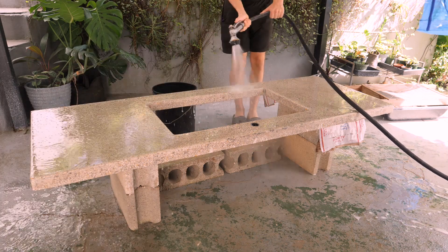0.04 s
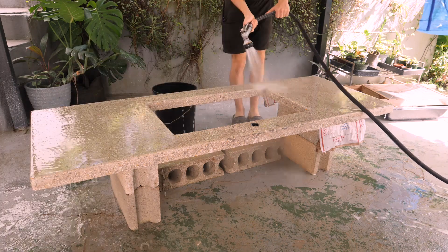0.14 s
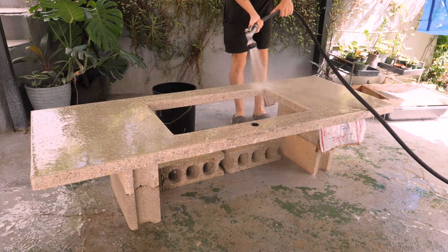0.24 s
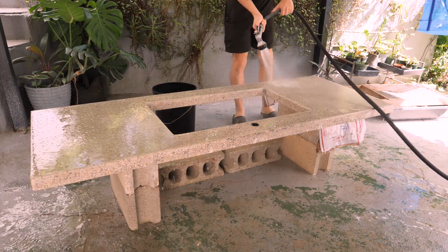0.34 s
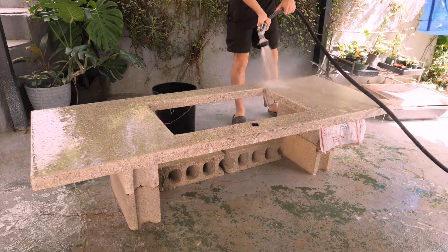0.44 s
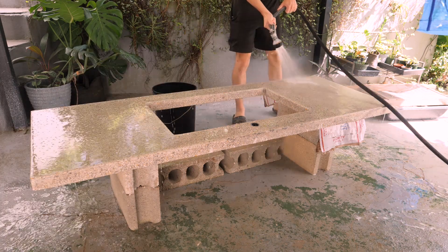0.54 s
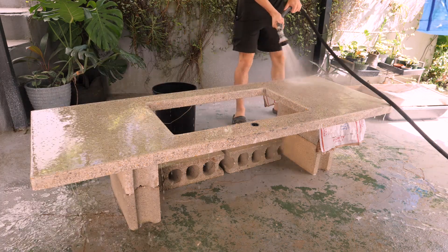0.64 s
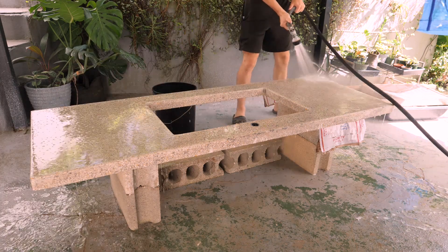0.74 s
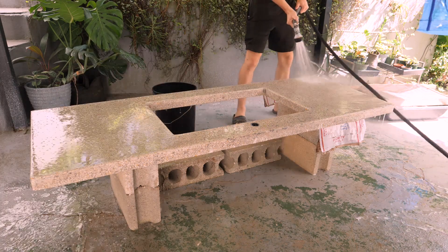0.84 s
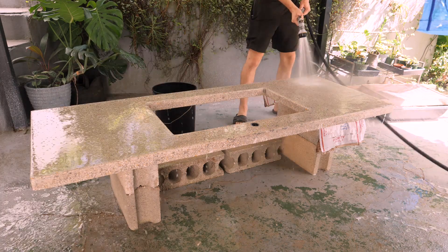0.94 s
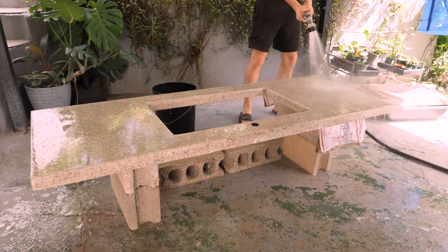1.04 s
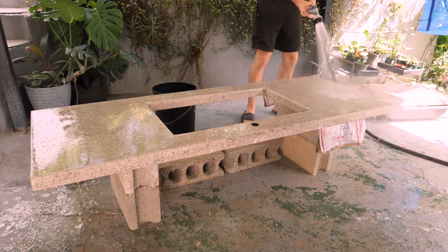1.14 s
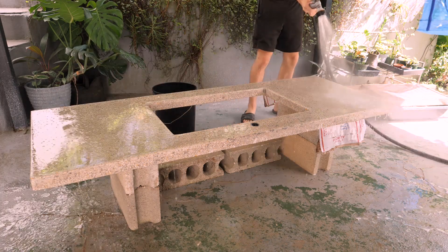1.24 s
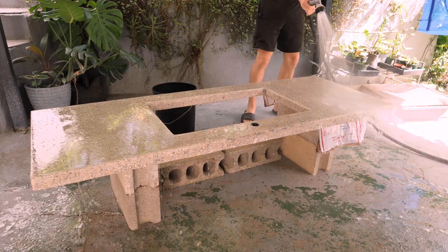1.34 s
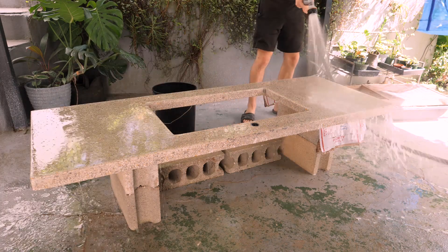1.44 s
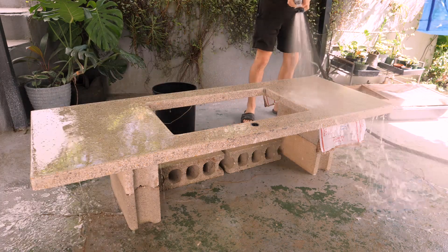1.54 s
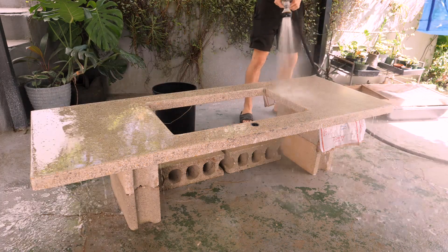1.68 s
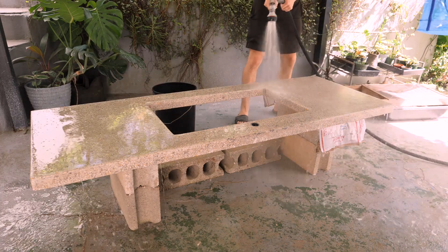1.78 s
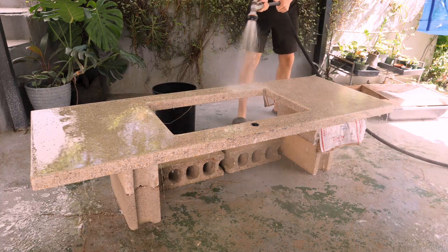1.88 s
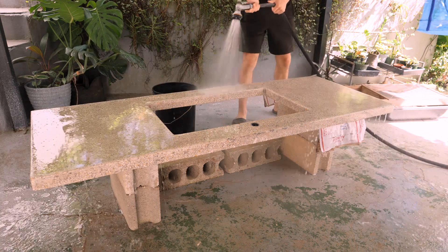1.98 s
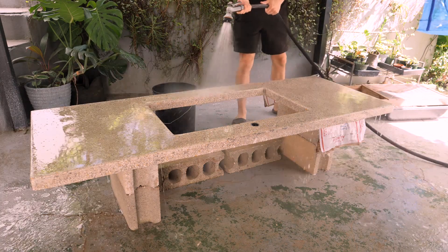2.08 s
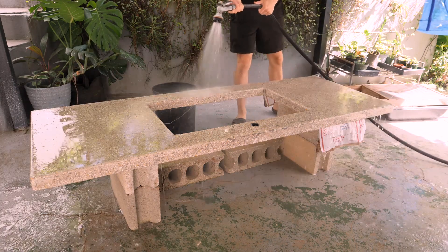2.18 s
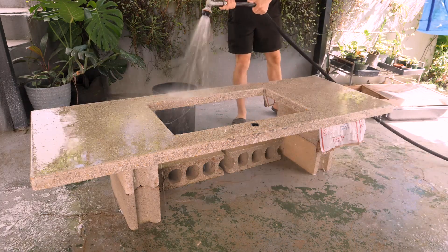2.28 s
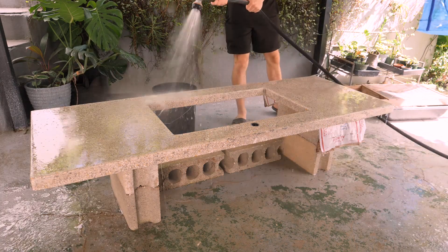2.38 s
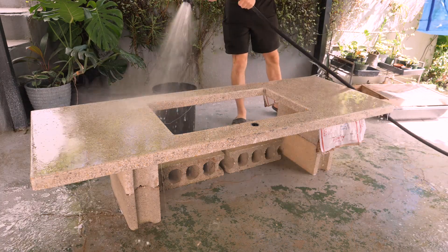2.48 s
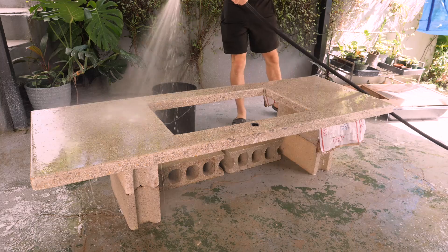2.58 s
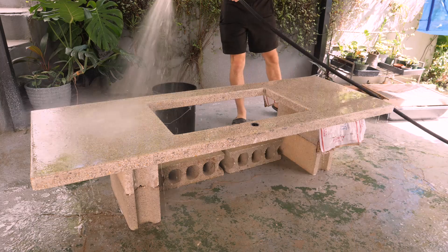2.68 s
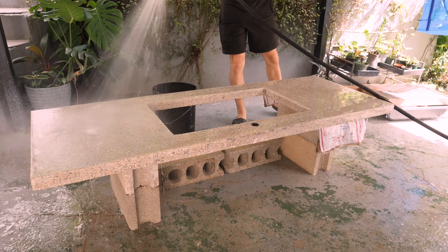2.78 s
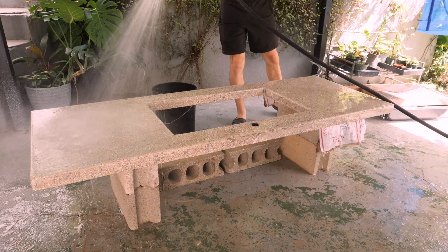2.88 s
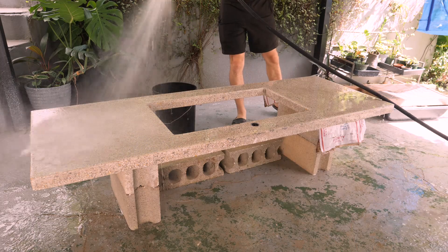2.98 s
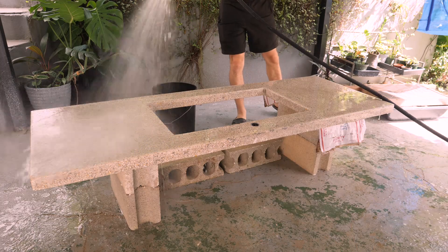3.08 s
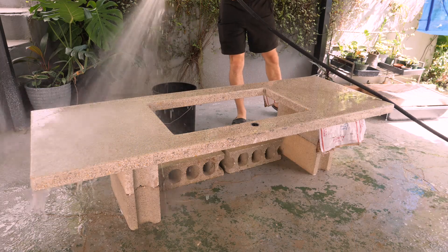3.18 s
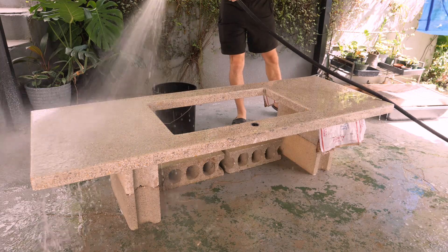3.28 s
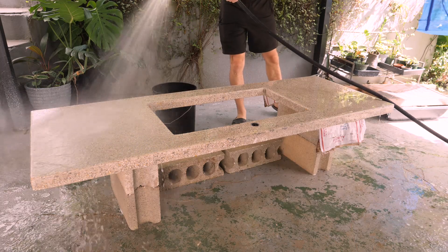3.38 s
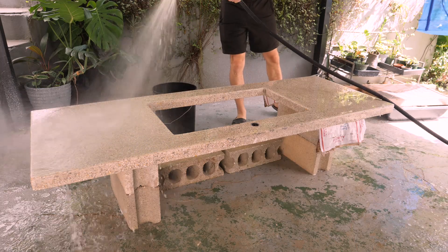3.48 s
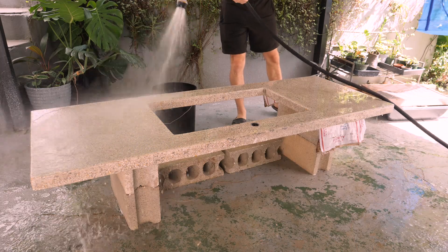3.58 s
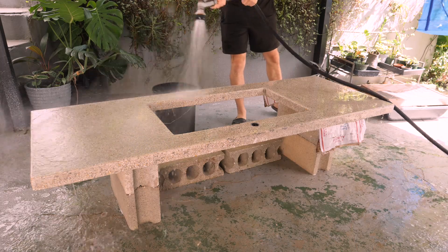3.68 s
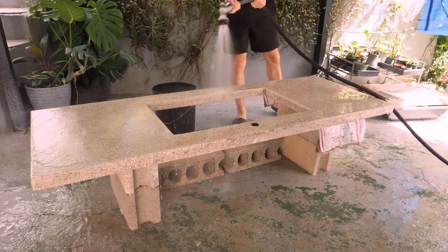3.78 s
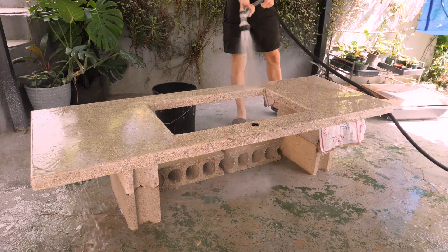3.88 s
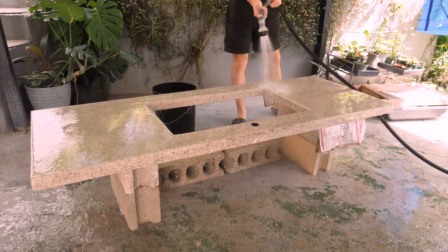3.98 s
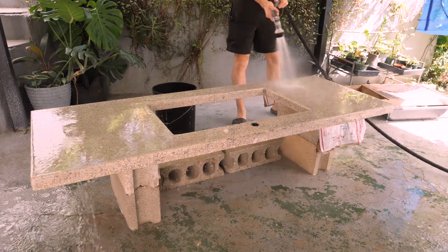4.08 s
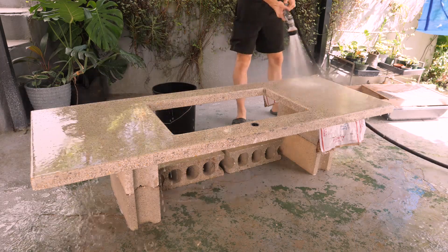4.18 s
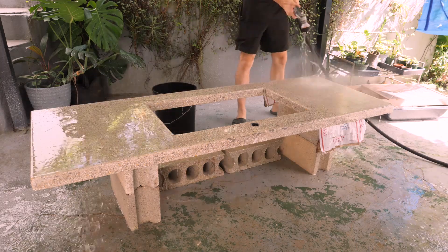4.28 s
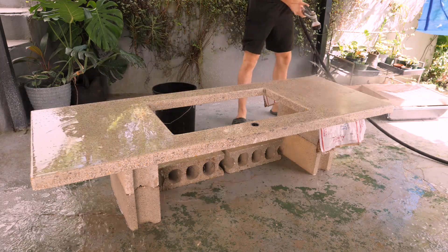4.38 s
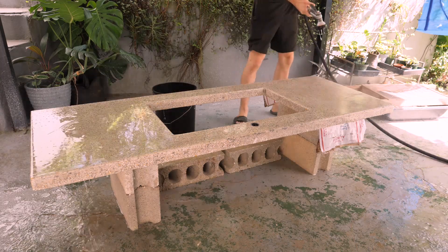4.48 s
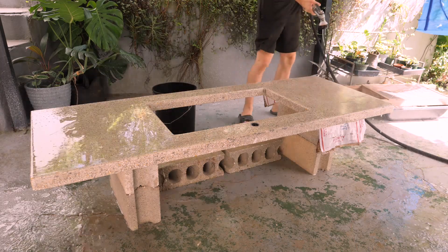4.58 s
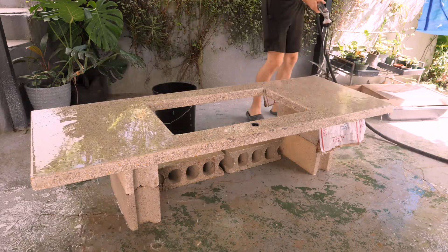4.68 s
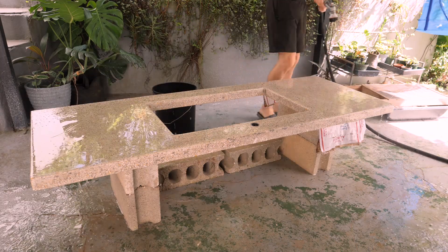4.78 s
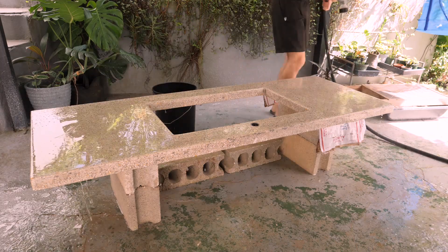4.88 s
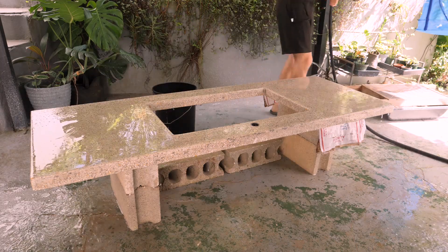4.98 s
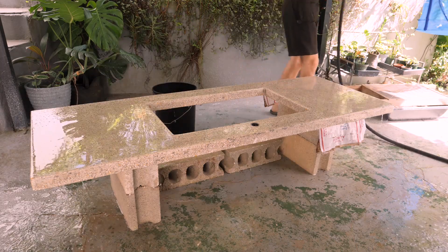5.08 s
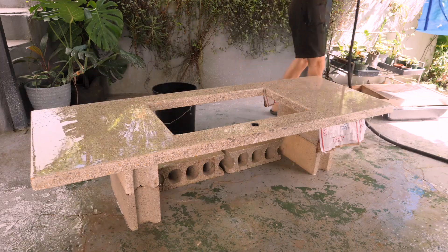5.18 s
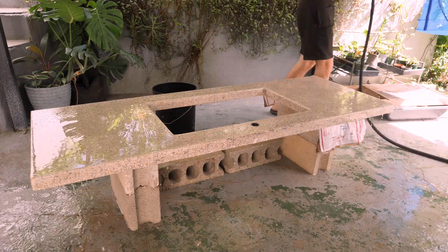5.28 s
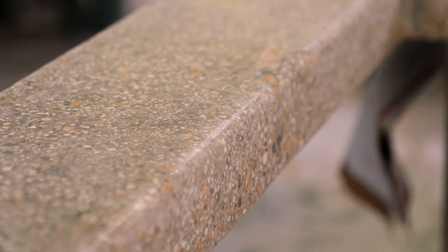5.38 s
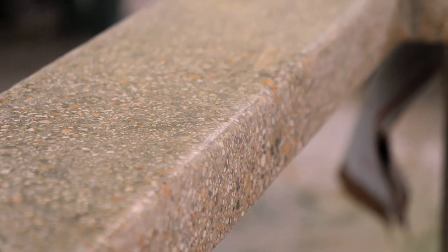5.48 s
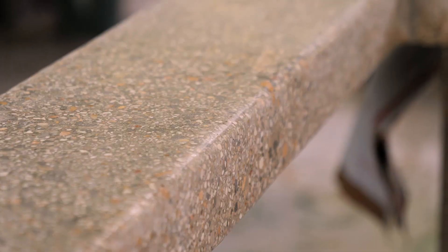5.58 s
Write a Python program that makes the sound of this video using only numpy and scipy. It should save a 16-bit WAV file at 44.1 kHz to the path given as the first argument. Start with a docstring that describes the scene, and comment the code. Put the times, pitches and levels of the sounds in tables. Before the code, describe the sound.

Hose spray hisses and patters from side to side on a stone slab outdoors, then stops, and run-off drips and splats below.

```python
"""First you hear a garden hose hissing on a wet stone countertop while stray drops drum on a plastic tub.
The spray sweeps from side to side, and each spot on the slab rings with its own hollow note.
The trigger is let go: run-off drips and slaps on the concrete of a walled yard, with soft knocks
farther off. Near the end the water and knocks stop at once, leaving a low rumble and a faint hum."""
import sys
import numpy as np
from scipy import signal
from scipy.fft import rfft, irfft, next_fast_len
from scipy.io import wavfile
from scipy.ndimage import uniform_filter1d, map_coordinates

SR = 44100
rng = np.random.default_rng(int(sys.argv[2]) if len(sys.argv) > 2 else 0)


def wav_record(signal):
    """Record a signal, one row per channel, as 16-bit PCM in the file named by sys.argv[1]."""
    frames = np.transpose(np.atleast_2d(signal))
    bounded = np.clip(frames, -1, 1)
    # unit amplitude maps onto the largest positive 16-bit level
    quanta = np.round(bounded * 32767).astype(np.int16)
    wavfile.write(sys.argv[1], SR, quanta)


N = 248670

SHUT_S, STOP_S = 4.392, 5.452  # the valve shuts; all water sound stops
LIFT_S, LIFT_PATTER_DB = 4.06, -5  # the nozzle tips up and the jet only grazes the slab
RIM_PLACE, RIM_REACH = 0.19, 0.18  # the rim of the sink opening, on the scale of JET_PATH
HOLLOW_WIDTH_HZ, HOLLOW_STEADY = 12.7, 0.7
TUB_LEAVE_S, TUB_CLEAR_S = 0.56, 1.02  # the jet moves on; the last drops reach the tub
TOP_HZ = 15900

# Where the jet lands, from -1 (left end of the slab) to +1 (right end): time_s, place
JET_PATH = [(0, 0.15), (.35, 0.27), (.8, 0.39), (1.3, 0.74), (1.55, 0.96), (1.85, 0.39), (2.3, -0.3),
            (2.8, -0.53), (3.25, -0.84), (3.5, -0.55), (3.8, 0.18), (4.0, 0.2), (4.4, 0.73)]
# The tone of each noise, or how strong it is from bass to treble: frequency_hz, level_db
HISS_TONE = [(30, -67), (350, -54), (700, -10), (1850, -7.5), (3200, -9), (4500, -4), (5200, -6),
             (6050, -2.5), (6900, -5), (7900, -3.5), (8800, -0.5), (10800, -2), (12900, -1.5),
             (16000, -9.5)]  # fine drops on stone
PATTER_TONE = [(30, -50), (400, -20.5), (570, -10), (730, -2), (1050, 3), (1350, 0), (1600, -10.5),
               (2200, -35), (4000, -52)]  # heavy drops in the film of water
WASH_TONE = [(30, -43), (180, -6.5), (520, 5.5), (900, -2), (2500, -43)]  # water washing over slab and rim
SPLASH_TONE = [(300, -63), (1900, -13), (2800, 1.5), (3700, 2.5), (5500, 1), (8000, -2), (15000, -21)]  # spills hitting the ground
TRICKLE_TONE = [(50, -51), (400, -7.5), (1000, -10.5), (1800, -6), (2700, -11), (4000, -3), (5800, -2.5),
                (9000, -1.5), (12500, -2), (15500, -15)]  # thin run-off
POUR_TONE = [(200, -28), (900, -3.5), (2500, -4.5), (6000, -17)]  # the duller stream off the edge
DROPLET_TONE = [(900, -20), (1900, -1.5), (2500, 2), (12500, -2), (16000, -5)]  # tiny splash droplets
RUMBLE_TONE = [(20, -30), (45, -27), (70, -16), (110, 2.5), (160, 2.5), (240, -3), (360, -0.5), (500, -2.5),
               (700, -9.5), (1500, -11.5), (4000, -20), (12000, -20), (15000, -58)]  # the low background
THUD_TONE = [(30, -30), (65, -19), (110, -7.5), (600, -13.5), (2000, -17)]  # dull thuds
# Hollow notes of the slab, woken when the jet lands nearby: pitch_hz, place, reach, level_db
HOLLOW_NOTES = [(741, -0.57, 0.58, -66.5), (838, 0.206, 0.049, -62.5), (900, 0.89, 0.12, -58.5),
                (949, -0.895, 0.095, -58), (977, -0.39, 0.075, -62), (1020, -0.94, 0.33, -60.5),
                (1021, 0.4, 0.12, -61.5), (1090, -0.8, 0.2, -60.5), (1184, 0.023, 0.24, -62.5),
                (1193, -0.41, 0.12, -61.5)]
# A higher note that glides as the jet turns and sweeps back: time_s, pitch_hz, level_db
GLIDING_NOTE = [(0.9, 1340, -74), (1.2, 1330, -61.5), (1.42, 1268, -66), (1.63, 1287, -55),
                (1.72, 1386, -68), (1.92, 1435, -60), (2.1, 1256, -66), (2.45, 1376, -67), (2.9, 1310, -81)]
# Sheets of water pushed over the edge: start_s, length_s, level_db
EDGE_SPILLS = [(1.13, 0.24, -53), (1.59, 0.13, -52), (2.86, 0.053, -54), (3.4, .06, -52),
               (3.63, 0.057, -53), (3.746, 0.032, -63), (4.2, 0.065, -56)]
# Gurgles as the jet crosses an edge: start_s, level_db, pitch_hz
EDGE_GURGLES = [(1.645, -45, 2830), (3.565, -44.5, 2550)]
# The notes at which the plastic tub rings: pitch_hz, width_hz, level_db
TUB_NOTES = [(22, 26, -1.5), (61.5, 6, -12), (83.6, 5.9, 5), (147, 11, 6), (175, 14, 0.5), (241, 36, -2),
             (325, 36, 0), (470, 250, -8.5)]
# How strongly the stream pours off the edge: time_s, level_db
POUR_LEVELS = [(4.6, -71), (4.82, -76), (5.2, -75.5), (5.35, -69.5)]
# Small falls of water into puddles: start_s, level_db, pitch_hz
PUDDLE_PLOPS = [(1.863, -44.5, 3980), (3.604, -47, 2850), (4.551, -50.5, 2000), (4.782, -53, 8300),
                (4.877, -51.5, 6000), (4.995, -53, 8840), (5.021, -53, 3000), (5.171, -53, 7020)]
# Slaps on wet concrete and their spatter: start_s, level_db, pitch_hz, width_octaves, fade_s,
# spatter_delay_s, spatter_level_db, spatter_pitch_hz, spatter_width_octaves
CONCRETE_SLAPS = [(4.683, -54, 8400, 0.06, 0.1, 0.001, -54, 7200, 0.7),
                  (4.705, -56, 2750, 0.14, 0.24, 0.001, -48, 7000, 1.2),
                  (5.104, -55.5, 4050, 0.22, 0.18, 0.006, -54, 8200, 0.5),
                  (5.217, -49, 4150, 0.26, 0.19, 0.022, -45, 9100, 0.3),
                  (5.290, -56, 4100, 0.3, 0.25, 0.002, -61, 9300, 0.2),
                  (5.322, -54, 5550, 0.06, 0.3, 0.0005, -47, 7100, 0.5)]
# Single drips: start_s, level_db, pitch_hz
SINGLE_DRIPS = [(4.452, -37.5, 5270), (4.502, -36, 5750), (4.509, -53, 5800), (4.581, -35.5, 7950),
                (4.645, -32, 8650), (4.6534, -36, 9200), (4.688, -44, 8100), (4.763, -40, 10100),
                (4.831, -36.5, 8160), (4.842, -47, 9500), (4.876, -42, 5200), (4.943, -38.5, 10350),
                (5.1135, -43, 8900), (5.1514, -49, 8850)]
# Soft knocks, about four a second: start_s, level_db
SOFT_KNOCKS = [(4.585, -65.5), (4.828, -69), (5.067, -67.5), (5.345, -70.5)]
# The notes of the hollow thing being knocked: pitch_hz, width_hz, level_db
KNOCK_NOTES = [(119, 52, -6.5), (254, 70, -3.5), (352, 23, 0.5), (495, 23, 5.5), (602, 66, -1),
               (780, 41, 0), (1090, 220, -6.5)]
# Dull thuds in the background: start_s, level_db, pitch_hz
DULL_THUDS = [(1.144, -51, 355), (4.38, -66, 114), (4.6, -70, 130), (4.868, -64, 125), (5.13, -64, 110.2),
              (5.432, -64, 293), (5.485, -72, 219)]
# First echoes off slab, ground and wall: delay_s, level_db
NEAR_ECHOES = [(.0025, -34), (.0058, -15.5), (.0093, -17), (0.0145, -11.5)]
# How long the yard's echo takes to fall by 60 dB: frequency_hz, fade_s
YARD_FADE = [(200, .3), (2000, 0.37), (14000, 0.084)]
# How alike the left and right sides sound (1 is the same): frequency_hz, likeness
NARROW_STEREO = [(200, 1), (400, 1), (700, 0.96), (1300, 0.83), (2400, 1), (6000, 0.96), (9400, 1),
                 (10300, 0.83), (12500, 0.63), (15500, .25)]  # the spray and most other sounds
WIDE_STEREO = [(150, 1), (1000, 0.72), (9000, 0.95), (12000, 0.55), (15500, 0.4)]  # water scattered over the ground


def spray():
    """The jet sweeps over the slab; drops still in the air land just after the valve shuts."""
    aim, = curves(JET_PATH)
    lift = ramp(LIFT_S, 0.13)
    drops = drops_on_stone(aim, lift)
    notes = amp(LIFT_PATTER_DB * lift) * slab_notes(aim)
    splashing = drops + sink_rim(aim) + spills()
    flow = amp(-169 * since(SHUT_S))
    pan = amp(0.5 * np.array([-aim, aim]) / 2)  # a little louder on the side being hit
    return flow * (notes + near_echoes(splashing, drift=0.0326)) * pan


def drops_on_stone(aim, lift):
    """Fine drops hiss on the stone, and heavy ones patter in the film of water."""
    hiss_db = -44 + 0.16 * aim - 0.1949 * clock() + 0.1 * lift
    on_edge = sum(np.sin(np.pi * ramp(s, 0.098)) for s, _, _ in EDGE_GURGLES)
    patter_db = -58 - aim - 2 * on_edge + LIFT_PATTER_DB * lift + 0.19 * wobble(11)
    hiss_db += 0.1 * wobble(17)
    fine = patchy(impacts(per_s=12000, spread_db=4.5, mist=0.31), depth_db=1.0)
    heavy = patchy(impacts(per_s=2500, spread_db=5.5, mist=0.49), depth_db=1.5)
    return amp(hiss_db) * shaped(fine, HISS_TONE) + amp(patter_db) * shaped(heavy, PATTER_TONE)


def slab_notes(aim):
    """Each spot rings hollow as the jet passes, and one higher note glides above them."""
    surge_db = 3.2 * np.sqrt(np.abs(1 - aim) / 2)  # to the left, the long jet breaks into clumps
    notes = np.zeros(N)
    for hz, place, reach, db in HOLLOW_NOTES:
        gain = amp(db + surge_db * wobble(14)) * nearness(aim, place, reach)
        notes += gain * ringing(hz + 11 * wobble(7), HOLLOW_WIDTH_HZ, HOLLOW_STEADY)
    glide_hz, glide_db = curves(GLIDING_NOTE)
    return notes + amp(glide_db) * ringing(glide_hz, HOLLOW_WIDTH_HZ, HOLLOW_STEADY)


def sink_rim(aim):
    """The water washes and whistles, louder on the sink's rim, which also rings when hit."""
    on_rim = nearness(aim, RIM_PLACE, RIM_REACH)
    wash = amp(-75.5 + 8.5 * on_rim) * shaped(noise(), WASH_TONE)
    whistle_db = -63.5 + 3.5 * on_rim - 1.3 * clock() + 1.1 * wobble(17)
    whistle = amp(whistle_db) * ringing(pitch_hz=2560 + 42 * wobble(9), width_hz=130)
    ring = amp(-63) * on_rim * ringing(pitch_hz=1851, width_hz=520)
    return wash + whistle + ring


def spills():
    """Each spill swells, holds and dies away as it splashes on the ground."""
    gain = sum(swell(s, db, rise_s=0.023, hold_s=length, die_s=0.084) for s, length, db in EDGE_SPILLS)
    return gain * shaped(impacts(per_s=1200, spread_db=6.0, mist=0.63), SPLASH_TONE, WIDE_STEREO)


def tub():
    """Stray drops drum on the tub's thin wall, growing louder until the jet moves on."""
    swell_db = 4 * np.minimum(clock() - TUB_LEAVE_S, 0)
    fade_db = 34 * since(TUB_LEAVE_S) + 60 * since(TUB_CLEAR_S)
    drumming = stereo(impacts(per_s=460, spread_db=6.0, mist=0.44), hollow_body(TUB_NOTES))
    return amp(-55.5 + swell_db - fade_db) * drumming


def run_off():
    """Water trickles, pours and gurgles off the slab, then plops, slaps and spatters below."""
    trickle_db = -62.3 - 1.2 * since(SHUT_S) + 1.9 * wobble(15)  # thins once the valve shuts
    trickle = amp(trickle_db) * shaped(patchy(noise(), depth_db=1.5), TRICKLE_TONE, WIDE_STEREO)
    pour_db = curves(POUR_LEVELS)[0] + 3.0 * wobble(30)
    pour = amp(pour_db) * shaped(impacts(per_s=900, spread_db=9.0, mist=0.41), POUR_TONE, WIDE_STEREO)
    droplets = patchy(impacts(per_s=4000, spread_db=6.0, mist=0.42), depth_db=1.5)
    droplets = shaped(droplets, DROPLET_TONE, WIDE_STEREO)
    gurgles = bursts(EDGE_GURGLES, droplets, octaves=0.45, rise_s=0.024, fade_s=0.44)
    plops = bursts(PUDDLE_PLOPS, droplets, octaves=0.3, rise_s=0.0058, fade_s=0.13)
    after_drips = [(s + 0.0038, db - 19.5, hz) for s, db, hz in SINGLE_DRIPS]
    drip_spatter = bursts(after_drips, droplets, octaves=0.61, rise_s=0.002, fade_s=0.13)
    return near_echoes(trickle + pour + gurgles + plops + slaps(droplets) + drip_spatter, drift=0.0314)


def slaps(droplets):
    """Falling water slaps the wet concrete and throws up spatter a moment later."""
    out = np.zeros((2, N))
    for s, db, hz, octaves, fade_s, delay_s, spatter_db, spatter_hz, spatter_octaves in CONCRETE_SLAPS:
        out += bursts([(s, db, hz)], droplets, octaves, rise_s=0.002, fade_s=fade_s)
        spatter = [(s + delay_s, spatter_db, spatter_hz)]
        out += bursts(spatter, droplets, spatter_octaves, rise_s=0.001, fade_s=0.23)
    return out


def drips():
    """Each drip lands with a tick: a tiny rising note plus a crack of noise."""
    out, t = np.zeros(N), np.arange(SR // 20) / SR
    for s, db, hz in SINGLE_DRIPS:
        band = signal.iirpeak(hz, 2, SR)
        crack = unit(signal.lfilter(*band, signal.lfilter(*band, rng.standard_normal(len(t)))))
        tick = np.sin(2 * np.pi * hz * t * (1 + 25 * t)) + 0.78 * crack
        gain = amp(db - 60 * t / 0.0077) * (1 - np.exp(-t / 0.00061))
        out[round(s * SR):][:len(t)] += gain * tick
    return filtered(out, lambda hz: 1 / np.sqrt(1 + (3500 / (hz + 1)) ** 4))  # keep the treble


def knocks():
    """Each soft knock swells, holds briefly and dies away in the same hollow body."""
    gain = sum(swell(s, db, rise_s=0.018, hold_s=0.065, die_s=0.038) for s, db in SOFT_KNOCKS)
    return gain * stereo(noise(), hollow_body(KNOCK_NOTES))


def near_echoes(x, drift):
    """Hard surfaces nearby add quick echoes, whose paths change a little as the water moves."""
    out, t = x.copy(), clock()
    for delay_s, db in NEAR_ECHOES:
        late = t - delay_s * (1 + drift * wobble(1.5))
        out += amp(db) * np.array([np.interp(late, t, side, left=0) for side in x])
    return out


def yard_echo(x):
    """Sound lingers between the yard's walls, and the high treble dies first."""
    hz, t, spectrum = signal.stft(rng.standard_normal((2, SR // 2)), SR, nperseg=256)
    fade = amp(-60 * t / along(YARD_FADE, hz)[:, None])
    tail = signal.istft(spectrum * fade, SR, nperseg=256)[1]
    return signal.fftconvolve(x[None], tail / np.linalg.norm(tail[0]), axes=1)[:, :N]


def background():
    """A low rumble that steps up as the spray ends, a few dull thuds and a last faint rising hum."""
    rumble_db = -75.5 + 1.5 * ramp(4.33, 0.08) + 2.4 * wobble(9)
    rumble = amp(rumble_db) * shaped(noise(), RUMBLE_TONE)
    hum_s = 5.46
    hum = amp(-77.5) * ramp(hum_s, 0.036) * ringing(pitch_hz=412 + 140 * since(hum_s), width_hz=8.2)
    thuds = bursts(DULL_THUDS, shaped(noise(), THUD_TONE), octaves=0.58, rise_s=0.0098, fade_s=0.36)
    return rumble + hum + thuds


def impacts(per_s, spread_db, mist):
    """Two showers of clicks of uneven size; mist is the share of drops too fine to hear one by one."""
    hits = rng.random((2, N)) < per_s / SR
    sizes = amp(spread_db * np.clip(noise(), -2, 2)) * rng.choice([-1, 1], (2, N))
    return np.sqrt(1 - mist) * unit(hits * sizes) + np.sqrt(mist) * noise()


def ringing(pitch_hz, width_hz, steady=0):
    """A note made of a narrow band of noise; steady (0 to 1) evens out its loudness."""
    a, b = filtered(noise(), lambda hz: 1 / (1 + (hz / width_hz) ** 2))
    phase = 2 * np.pi * np.cumsum(pitch_hz * np.ones(N)) / SR
    strength = unit(np.hypot(a, b)) + 0.1
    return unit((a * np.cos(phase) + b * np.sin(phase)) / strength ** steady)


def bursts(rows, source, octaves, rise_s, fade_s):
    """One band of the source swells for each (start_s, level_db, pitch_hz), losing 60 dB in fade_s."""
    out, t = np.zeros((2, N + SR)), np.arange(SR // 2) / SR
    hz = np.fft.rfftfreq(len(t), 1 / SR) + 1
    for s, db, pitch_hz in rows:
        start = round(s * SR)
        piece = np.take(source, start + np.arange(len(t)), axis=1, mode="wrap")
        band = 1 / (1 + (np.log2(hz / pitch_hz) / octaves) ** 2) ** 0.76
        burst = unit(irfft(rfft(piece) * band, len(t)))
        out[:, start:start + len(t)] += burst * amp(db - 60 * t / fade_s) * (1 - np.exp(-t / rise_s))
    return out[:, :N]


def hollow_body(notes):
    """A filter for an object that rings at its own notes."""
    return lambda hz: sum((-1) ** k * amp(db) * 1j * hz * width / (pitch**2 - hz**2 + 1j * hz * width)
                          for k, (pitch, width, db) in enumerate(notes))


def patchy(pair, depth_db):
    """Make a sound flicker: small patches of pitch and time get louder or softer at random."""
    spectrum = signal.stft(pair, nperseg=512)[2]
    patches = uniform_filter1d(rng.standard_normal(spectrum.shape[1:]), size=7, axis=0)
    patches = uniform_filter1d(patches, size=12, axis=1)
    return signal.istft(spectrum * amp(depth_db * unit(patches)), nperseg=512)[1][:, :N]


def stereo(pair, response, likeness=NARROW_STEREO):
    """Filter two unrelated signals into left and right: alike in the bass, more apart in the treble."""
    def blend(hz):
        angle = np.arccos(np.clip(along(likeness, hz), -1, 1)) / 2
        return response(hz) * np.array([np.cos(angle), np.sin(angle)])
    mid, side = filtered(pair, blend)
    return unit(np.array([mid + side, mid - side]))


def shaped(pair, tone, likeness=NARROW_STEREO):
    """Stereo sound coloured by a tone table."""
    return stereo(pair, lambda hz: amp(along(tone, hz)), likeness)


def filtered(x, response):
    """Multiply each frequency in x by response(hz)."""
    size = next_fast_len(N + SR // 2)
    return irfft(rfft(x, size) * response(np.fft.rfftfreq(size, 1 / SR)), size)[..., :N]


def along(points, hz):
    """Read a (frequency_hz, value) table between its rows, on a log scale."""
    row_hz, values = np.transpose(points)
    return np.interp(np.log(hz + 1), np.log(row_hz + 1), values)


def curves(rows):
    """One value per sample for each column after the time."""
    times, *columns = np.transpose(rows)
    return [np.interp(clock(), times, column) for column in columns]


def swell(start_s, db, rise_s, hold_s, die_s):
    """A gain that rises, then starts dying away hold_s after its start."""
    return amp(db) * ramp(start_s, rise_s) * np.exp(-since(start_s + hold_s) / die_s)


def nearness(aim, place, reach):
    """1 when the jet is right on a place, falling towards 0 away from it."""
    return np.exp(-((aim - place) / reach) ** 2 / 2)


def wobble(per_s):
    """A smooth curve through per_s random values a second."""
    return map_coordinates(rng.standard_normal(int(N * per_s / SR) + 4), [clock() * per_s])


def noise():
    """Two unrelated channels of white noise."""
    return rng.standard_normal((2, N))


def ramp(start_s, length_s):
    """0 before the start, then rising evenly to 1."""
    return np.clip((clock() - start_s) / length_s, 0, 1)


def since(start_s):
    """Seconds since the start, 0 before it."""
    return np.maximum(clock() - start_s, 0)


def clock():
    """The time of every sample, in seconds."""
    return np.arange(N) / SR


def amp(db):
    """Turn decibels into a gain."""
    return 10 ** (np.asarray(db) / 20)


def unit(x):
    """Scale to an average strength (rms) of 1."""
    return x / np.sqrt(np.mean(x ** 2) + 1e-20)


def scene():
    """The water and knocks play until STOP_S; the low background carries on."""
    ticks = drips()
    water = spray() + tub() + run_off() + ticks + amp(-7.0) * yard_echo(ticks)
    return (water + knocks()) * (clock() < STOP_S) + background()


def record(dry):
    """Remove the highest treble, above TOP_HZ."""
    return filtered(dry, lambda hz: hz < TOP_HZ)


dry = scene()
out = record(dry)
wav_record(out)
```